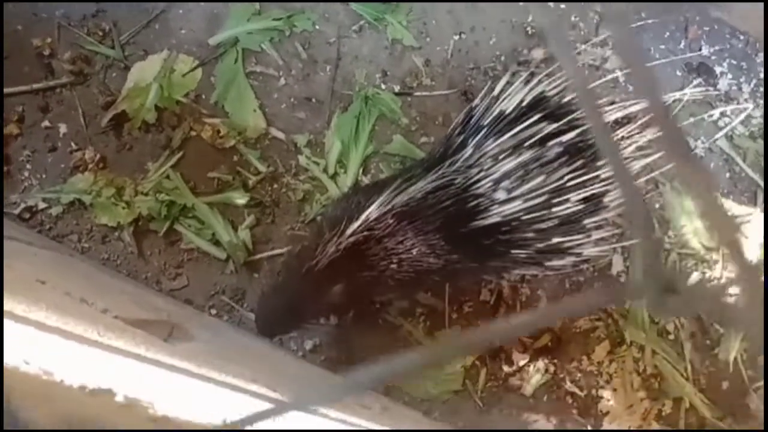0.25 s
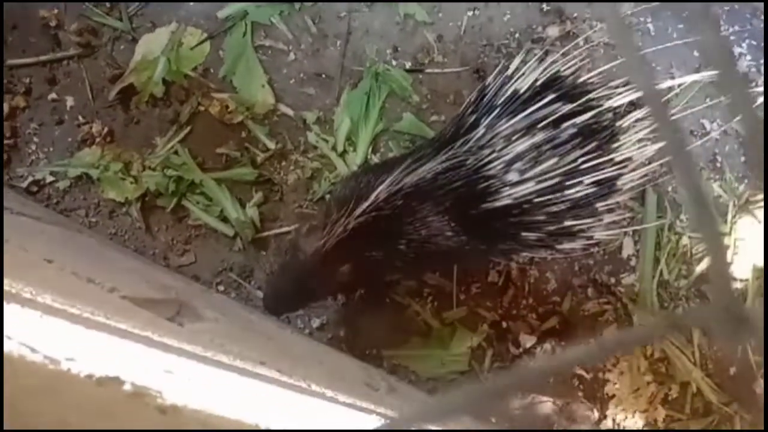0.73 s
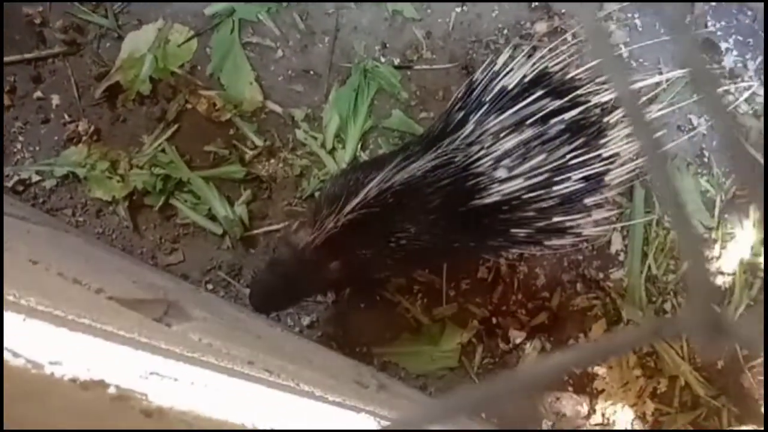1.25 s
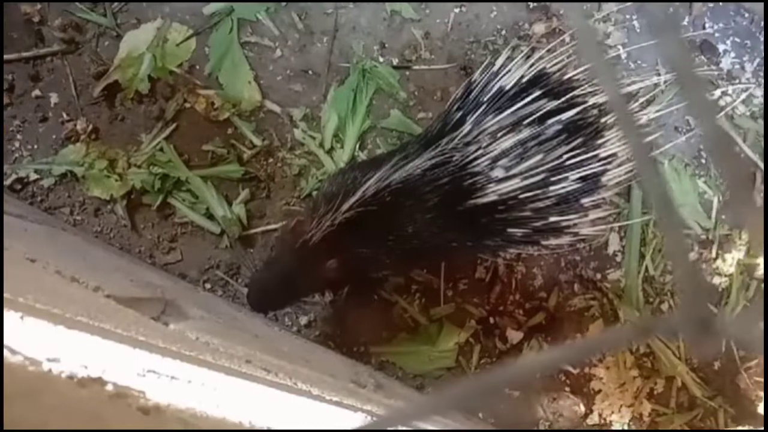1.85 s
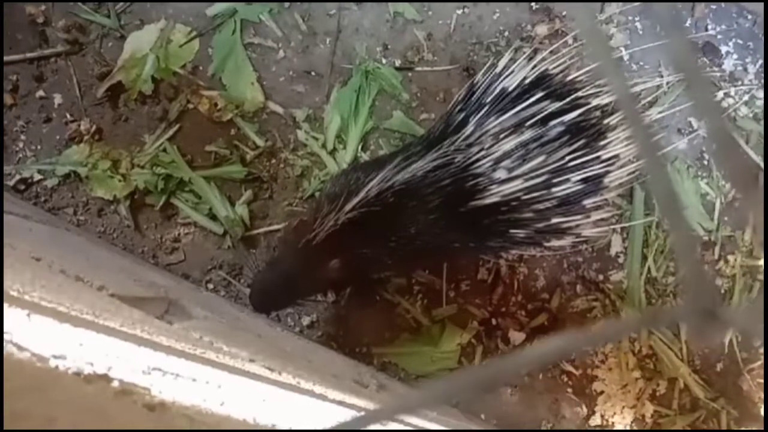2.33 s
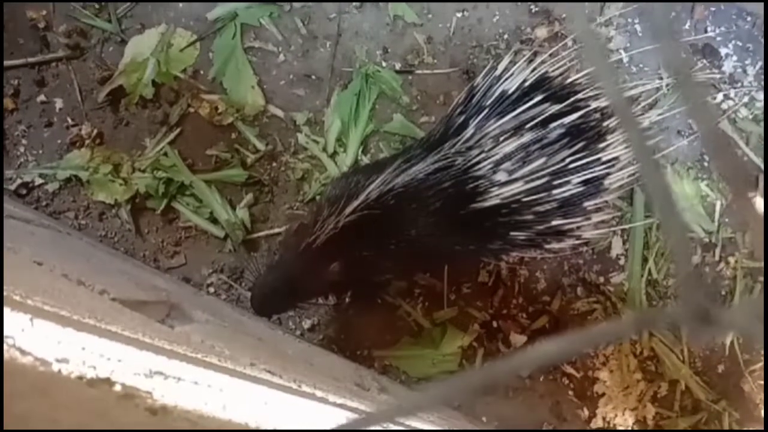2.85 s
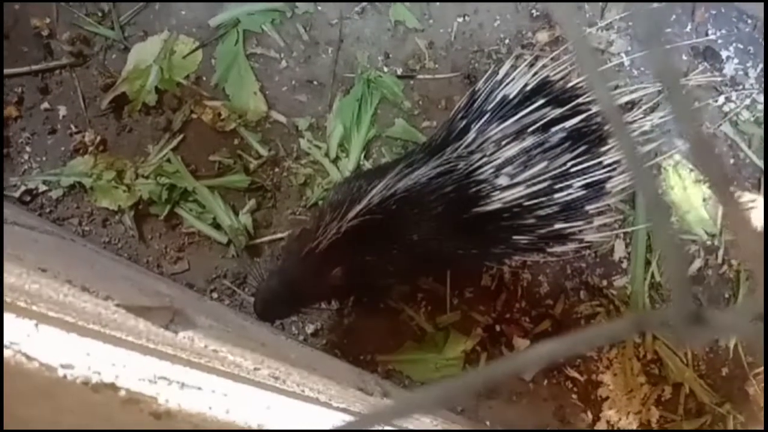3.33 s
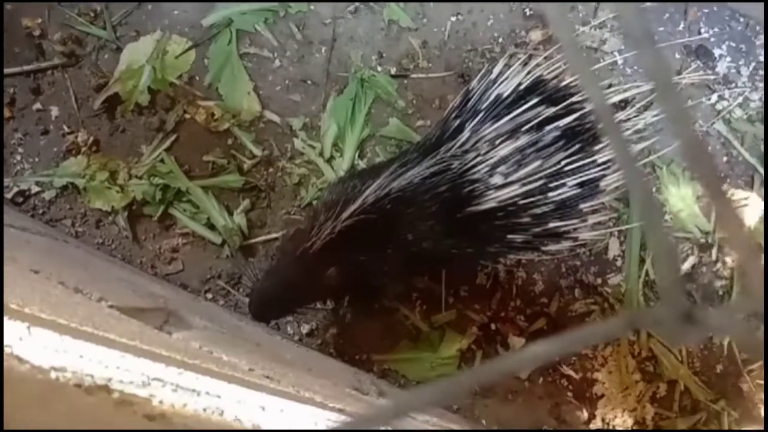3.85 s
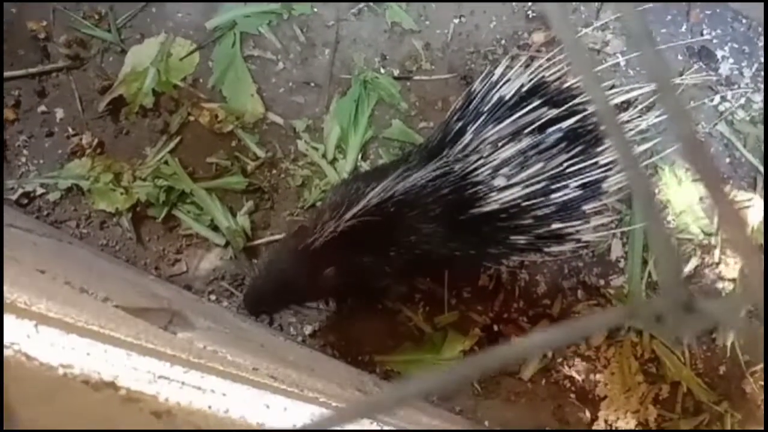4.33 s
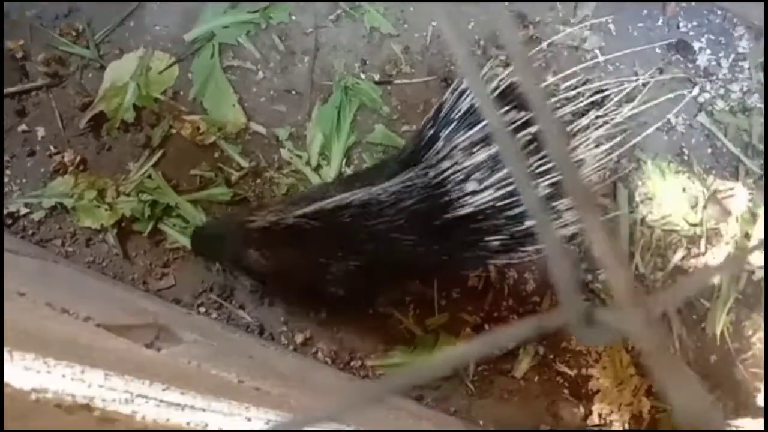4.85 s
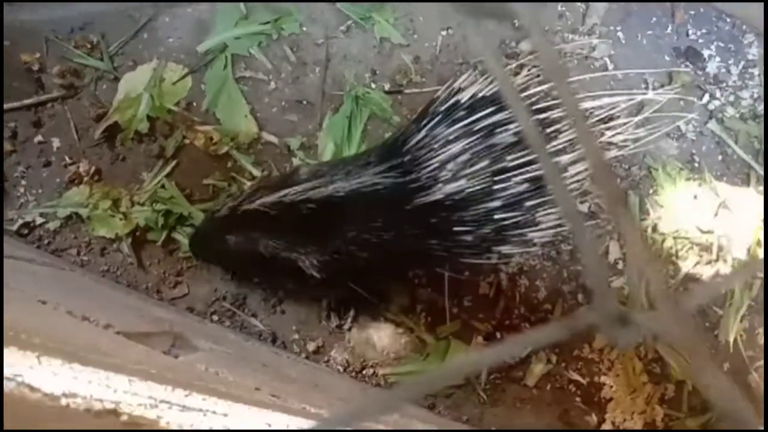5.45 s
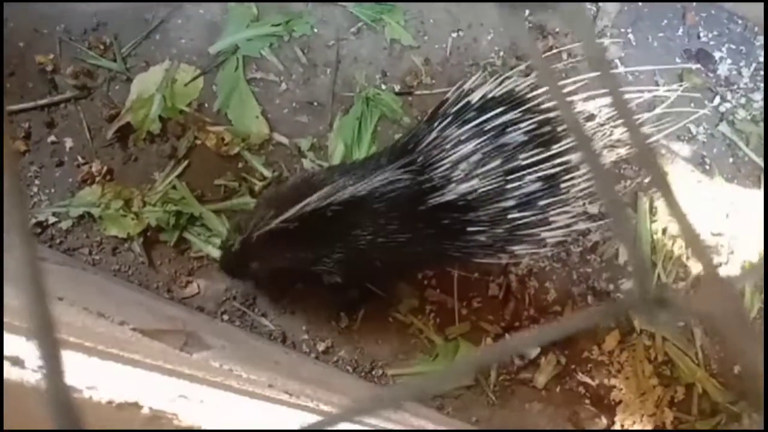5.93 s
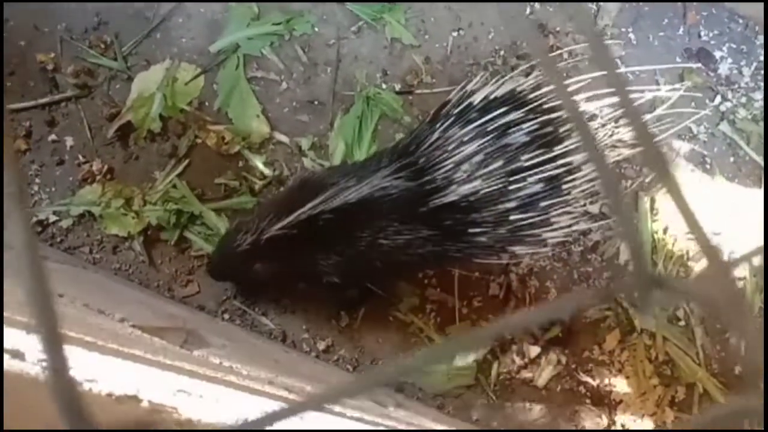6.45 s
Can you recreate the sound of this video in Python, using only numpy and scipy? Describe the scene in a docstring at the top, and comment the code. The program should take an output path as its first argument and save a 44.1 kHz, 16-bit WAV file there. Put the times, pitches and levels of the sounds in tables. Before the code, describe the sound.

Scattered crunches, sharp quill clicks and knocks sound against a faint wavering whirr, then a low engine begins to throb.

```python
"""A steady outdoor hiss and a wavering whirr surround a porcupine foraging among leaves in a pen.
It crunches and scuffs, tiny fractures exciting hollow resonances, and its quills collide and rattle.
A few knocks ring in damped modes close to the microphone, and faint tones sound far off.
Near the end a slow engine starts to throb, each firing ringing its exhaust, then picks up speed."""
import sys
import numpy as np
from scipy import signal
from scipy.fft import rfft, irfft
from scipy.io import wavfile
from scipy.ndimage import uniform_filter1d

SR = 44100
rng = np.random.default_rng(int(sys.argv[2]) if len(sys.argv) > 2 else 0)


def unload_audio(sound):
    """Save the sound as a 16-bit wav file, at the path given as the first command line argument."""
    columns = np.transpose(np.atleast_2d(sound))
    # keep every value between -1 and 1, then stretch to whole-number steps
    steps = np.round(np.clip(columns, -1, 1) * 32767)
    wavfile.write(sys.argv[1], SR, steps.astype(np.int16))


N = 295470


def amp(db):
    """Decibels to amplitude ratio."""
    return 10 ** (np.asarray(db) / 20)


def unit(x):
    """Normalisation to rms 1."""
    return x / np.sqrt(np.mean(x ** 2))


def sine(hz, t):
    """Simple harmonic motion."""
    return np.sin(2 * np.pi * hz * t)


def decay(t, t60):
    """Exponential damping: 60 dB in t60 seconds."""
    return np.exp(-np.log(1000) * t / t60)


def swell(t, peak_s):
    """A critically damped pulse, reaching 1 at peak_s."""
    return t / peak_s * np.exp(1 - t / peak_s)


def curve(rows):
    """Linear interpolation of (seconds, value) rows at every sample."""
    return np.interp(np.arange(N) / SR, *np.transpose(rows))


def add(out, s, x):
    """Superposition: x joins out from s seconds on."""
    i = int(s * SR)
    out[i:i + len(x)] += x[:N - i]


def colour(x, points):
    """Spectral shaping by (Hz, dB) points."""
    hz, db = np.transpose(points)
    f = np.maximum(np.fft.rfftfreq(len(x), 1 / SR), 1)
    return irfft(rfft(x) * amp(np.interp(np.log(f), np.log(hz), db)), len(x))


def band(x, hz, width):
    """Two like resonators in cascade give a band with steep skirts."""
    b, a = signal.iirpeak(hz, hz / (1.5 * width), fs=SR)
    return signal.lfilter(b, a, signal.lfilter(b, a, x))


def lowpass(x, hz):
    """Sixth-order roll-off above hz."""
    return signal.sosfilt(signal.butter(6, hz, fs=SR, output="sos"), x)


def highpass(x, hz):
    """Fourth-order roll-off below hz."""
    return signal.sosfilt(signal.butter(4, hz, "highpass", fs=SR, output="sos"), x)


def walk(rate):
    """Random modulation: levels held 1 / rate seconds, then smoothed."""
    hold = int(SR / rate)
    steps = np.repeat(rng.standard_normal(N // hold + 1), hold)
    return unit(uniform_filter1d(uniform_filter1d(steps, hold), hold)[:N])


def grit(n, spread_db, size=24):
    """Granular noise: each run of size samples has its own random strength."""
    grains = np.repeat(amp(spread_db * rng.standard_normal(n // size + 1)), size)[:n]
    return rng.standard_normal(n) * grains


def patter(low_hz, high_hz, t60, spread_db, count):
    """Incoherent sum: many small things ring briefly, each at its own moment and pitch."""
    out, t = np.zeros(N), np.arange(SR // 8) / SR
    shape = np.minimum(t / 0.015, 1) * decay(t, t60)
    for when, pitch, size in rng.random((count, 3)):
        hz = low_hz * (high_hz / low_hz) ** pitch
        add(out, when * (N - 1) / SR, amp(spread_db * size) * shape * sine(hz, t))
    return unit(out)


def burst(hz, width, rise_s, t60, spread_db):
    """Forced resonance: a burst of tiny fractures drives one hollow mode."""
    t = np.arange(SR // 3) / SR
    shape = np.minimum(t / rise_s, 1) * decay(np.maximum(t - rise_s, 0), t60)
    # small things radiate little below their resonance
    cracks = highpass(shape * grit(len(t), spread_db), .6 * hz)
    ring = band(cracks, hz, width)
    return ring * np.linalg.norm(shape) / np.linalg.norm(ring)


def fractures(rows, rise_s, t60, spread_db):
    """Modal superposition: each event sounds a burst in each of its resonances."""
    out = np.zeros(N)
    for s, width, *modes in rows:
        for hz, db in zip(modes[::2], modes[1::2]):
            add(out, s, amp(db) * burst(hz, width, rise_s, t60, spread_db))
    return out


# Spectra of the low air noise and the high hiss. Each row: frequency in Hz, relative density in dB.
AIR_SPECTRUM = [(25, -13), (45, -3.5), (80, 2.5), (130, -1.5), (220, -7), (450, -8.5), (700, -11.5),
                (1000, -13), (1600, -11), (2700, -9), (3500, -8.5), (4300, -18.5), (6000, -46)]
HISS_SPECTRUM = [(3000, -37), (4400, -13), (4900, -3.5), (5300, 4.5), (5850, 5), (6200, -4.5), (6900, 4.5),
                 (7400, -0.5), (7950, -14.5), (9300, -6.5), (11500, -11.5), (13700, -18), (15000, -18),
                 (16000, -10.5)]


def outdoor_air(air_db=-61.5, settled_db=-60.5, excess_db=6.5, settle_s=3.14):
    """Broadband noise: a steady rumble lies under a flickering hiss that starts higher and settles."""
    rumble = unit(colour(rng.standard_normal(N), AIR_SPECTRUM)) * amp(air_db + 0.1 * walk(21))
    hiss_db = settled_db + excess_db * np.exp(-np.arange(N) / SR / settle_s)
    hiss = unit(colour(rng.standard_normal(N), HISS_SPECTRUM)) * amp(hiss_db + 1.42 * walk(36))
    return rumble + hiss


# The whirr comes and goes. Each row: time in seconds, base level in dB.
WHIRR_ENVELOPE = [(0, -70.5), (.35, -63), (.72, -59.5), (1.15, -63), (1.5, -62.5), (1.8, -67), (2.1, -59),
                  (2.31, -61.5), (2.6, -59.5), (2.85, -68), (3.1, -76), (3.25, -68), (3.53, -71),
                  (3.9, -67.5), (4.6, -64.5), (5.3, -70), (5.5, -66), (5.8, -75), (6.1, -64), (6.7, -65)]
# Pulses that stand out as pings. Each row: start in seconds, frequency in Hz, level in dB.
WHIRR_PINGS = [(2.297, 1317, -46), (3.357, 1325, -50), (4.209, 1290, -51), (4.656, 1290, -51),
               (5.996, 1255, -47)]
WHIRR_HZ, WHIRR_STRAY_HZ, WHIRR_SWELL_S = 1254, 40, .009


def whirr(pulses_per_s=13, pulse_db=5, scatter_db=4, trace_db=-7):
    """A jittered pulse train: short rings stray in pitch over a faint trace of narrow-band noise."""
    out, t = np.zeros(N), np.arange(SR // 6) / SR
    level_db = curve(WHIRR_ENVELOPE)
    s = 0
    while s < (N - 1) / SR:
        pitch, size, gap = rng.uniform(-1, 1, 3)
        gain = amp(level_db[int(s * SR)] + pulse_db + scatter_db * size)
        add(out, s, gain * swell(t, WHIRR_SWELL_S) * sine(WHIRR_HZ + WHIRR_STRAY_HZ * pitch, t))
        s += (1 + .5 * gap) / pulses_per_s
    for s, hz, db in WHIRR_PINGS:
        add(out, s, amp(db) * np.minimum(t / .005, 1) * decay(t, t60=.12) * sine(hz, t))
    trace = unit(band(rng.standard_normal(N), WHIRR_HZ, width=160))
    return out + trace * amp(level_db + trace_db)


# The animal pushes through the leaves. Each row: start in seconds, length in seconds, level in dB.
LEAF_PUSHES = [(0.46, 0.36, -62), (2.328, 0.23, -57), (3.686, 0.348, -59.5), (4.16, 0.81, -64.5)]


def leaves(rest_db=-68, rise_s=0.097, fall_s=0.018):
    """Incoherent sources add in power: each push raises the rustle above a slight constant fidget."""
    t, power = np.arange(N) / SR, amp(rest_db) ** 2
    for s, length, db in LEAF_PUSHES:
        push = np.clip((t - s) / rise_s, 0, 1) * np.exp(-np.maximum(t - s - length, 0) / fall_s)
        power = power + (amp(db) * push) ** 2
    stems = patter(1900, 3050, t60=.09, spread_db=10, count=1900)
    crackle = amp(-8.5) * unit(band(grit(N, spread_db=3), 2200, width=450))
    return (stems + crackle) * np.sqrt(power) * amp(1.2 * walk(20))


def far_patter():
    """Sparse damped oscillations make a faint, low patter far off."""
    return amp(-73) * patter(170, 750, t60=.2, spread_db=12, count=150)


# Bites. Each row: start in seconds, bandwidth in Hz, then frequency in Hz and level in dB
# for each of the low, middle and high resonances.
BITES = [(.1955, 266, 1600, -42, 2790, -41.5, 3340, -44), (.273, 280, 2210, -43, 2520, -49, 2900, -73),
         (.717, 300, 3400, -58, 3700, -55, 3920, -59), (1.014, 350, 1380, -58, 2600, -52.5, 3130, -53),
         (1.052, 410, 1360, -49, 2070, -49.5, 2780, -46.5), (1.349, 277, 1460, -50, 1950, -45, 2210, -57),
         (2.0685, 350, 1290, -51, 2100, -45, 2650, -49.5), (4.397, 270, 1290, -52.5, 1630, -47, 2400, -55),
         (4.613, 300, 1460, -60, 1920, -53, 2900, -55), (4.932, 195, 1480, -46, 1900, -47, 2400, -47),
         (5.023, 168, 1370, -44.5, 1570, -62, 2450, -52.5), (5.191, 397, 1470, -53, 2820, -52.5, 3380, -51)]


def crunches():
    """Impulsive excitation: a quick bite sets three hollow resonances ringing."""
    return fractures(BITES, rise_s=.0025, t60=0.17, spread_db=2.5)


# Soft thumps, probably paws on the soil. Each row: start in seconds, level in dB.
SOFT_THUMPS = [(0.198, -49.5), (1.029, -55.5), (5.193, -54)]


def thumps(hz=270, width_hz=95):
    """Damped resonance: each soft impact excites one low band."""
    out = np.zeros(N)
    for s, db in SOFT_THUMPS:
        add(out, s, amp(db) * burst(hz, width_hz, rise_s=0.0013, t60=0.28, spread_db=2.5))
    return out


# Shakes of the whole coat, and single quill clicks. Each row: start in seconds, base level in dB.
COAT_SHAKES = [(.291, -48.5), (.786, -53.5), (4.396, -51), (4.933, -55), (5.359, -55.5), (6.394, -59.5)]
QUILL_CLICKS = [(1.053, -50), (1.351, -47.5), (1.385, -48), (1.426, -48), (1.4459, -44), (1.454, -45.5),
                (1.471, -48.5), (1.539, -43.5), (1.560, -45.5), (1.6609, -43.5), (1.758, -49.5),
                (1.861, -43.5), (1.895, -43), (1.925, -44.5), (1.9495, -42.5), (1.984, -42.5), (1.998, -47)]
# The spectrum of both. Each row: frequency in Hz, gain in dB.
QUILL_SPECTRUM = [(200, 2), (700, -6), (1500, 0.5), (2200, 3.5), (3000, 11), (3600, 6), (4400, -3),
                  (5200, 12), (5950, 13), (6300, 1), (6950, 12.5), (8100, -8), (9000, 3), (10400, 2),
                  (13000, -9.5), (15500, -20)]
# Ranges in which a struck quill rings. Each row: lowest and highest frequency in Hz.
QUILL_MODE_RANGES = [(5100, 6000), (5900, 7200)]


def quills(clack_db=-2.5, chatter_db=-15, ring_db=-1, min_skip_s=.0012, skip_loss_db=5):
    """Collision and rebound: hollow quills snap, skip once and chatter; single clicks also ring."""
    hits, rings, t = np.zeros(N), np.zeros(N), np.arange(SR // 3) / SR
    chatter = amp(chatter_db) * np.minimum(t / .01, 1) * decay(t, t60=.3)
    for rows, t60, snap_db in (QUILL_CLICKS, .065, 6), (COAT_SHAKES, 0.27, -5):
        clack = amp(clack_db) * np.minimum(t / .001, 1) * decay(t, t60)
        for s, db in rows:
            add(hits, s, amp(db) * (clack + chatter) * unit(grit(len(t), spread_db=4)))
            add(hits, s, amp([db + snap_db]))
            add(hits, s + min_skip_s * (1 + rng.random()), amp([db + snap_db - skip_loss_db]))
    for s, db in QUILL_CLICKS:
        for hz in rng.uniform(*np.transpose(QUILL_MODE_RANGES)):
            add(rings, s, amp(db + ring_db) * sine(hz, t) * decay(t, t60=0.041))
    hits = colour(hits, QUILL_SPECTRUM)
    ground_echo = .5 * np.roll(hits, int(0.0021 * SR))  # comb filtering makes the sound hollow
    return hits + ground_echo + rings


# Close knocks; the first lands twice and bounces. Each row: start in seconds, strength in dB at each
# of the five BLOW_HZ, tick level in dB, upper limit of the contact's band in Hz.
BLOWS = [(0.4749, -35, -15.5, -8, -20.5, -7, -58, 3500), (0.4757, -44, -6.5, -7.5, -41, -36, -70, 4300),
         (0.4993, -36, -27, -28.5, -34, -48, -75, 2980), (0.512, -33, -26, -57, -35, -46, -75, 1680),
         (0.526, -40, -43, -37, -35.5, -48, -75, 1400),
         (3.6839, -33.5, -32, -23.5, -24.5, -14.5, -24, 3600),
         (3.9305, -30, -26, -35, -43.5, -56, -55, 2270), (6.278, -38, -52, -30.5, -44.5, -28, -60, 2410)]
BLOW_HZ = [110, 280, 750, 1280, 2500]
# The modes they excite. Each row: frequency in Hz, gain in dB, 60 dB decay time in seconds.
STRUCK_MODES = [(94.2, -2, 0.082), (150, 6.5, 0.017), (254, 1.5, 0.0276), (408, 4.5, 0.0076),
                (700, 0.8, 0.0094), (1080, -3.5, 0.013), (1259, -2, 0.037), (1417, 0, 0.015),
                (2004, -7, 0.01), (2620, -9.5, 0.0049), (3600, -15, 0.0036)]
# The tick of first contact. Each row: frequency in Hz, gain in dB.
TICK_SPECTRUM = [(500, -6), (3200, -28), (4400, -19), (5800, 14), (7000, -7), (8000, 1), (10000, 4),
                 (13000, -5), (15500, -9)]


def knocks():
    """Modal vibration: where a blow lands weights the same damped modes; soft contact dulls them."""
    out, ticks, t = np.zeros(N), np.zeros(N), np.arange(SR // 4) / SR
    for s, *strengths_db, tick_db, top_hz in BLOWS:
        ring = 0
        for k, (hz, db, t60) in enumerate(STRUCK_MODES):
            blow_db = np.interp(np.log(hz), np.log(BLOW_HZ), strengths_db)
            ring = ring + (-1) ** k * amp(db + blow_db) * sine(hz, t) * decay(t, t60)
        add(out, s, lowpass(ring, top_hz))
        add(ticks, s, amp([tick_db]))
    return out + colour(ticks, TICK_SPECTRUM)


# Scuffs. Each row: start in seconds, bandwidth in Hz, then three pairs of frequency in Hz, level in dB.
SLOW_SCUFFS = [(.812, 221, 602, -48.5, 1330, -52, 2500, -54.5),
               (2.137, 120, 820, -50.5, 1306, -51, 2460, -56.5),
               (2.575, 400, 2140, -64, 2550, -54.5, 2920, -57),
               (3.79, 300, 1880, -70, 2150, -69, 2400, -73), (4.17, 249, 2030, -69, 2120, -56, 2400, -68),
               (4.275, 248, 1950, -72, 2120, -55.5, 2300, -62),
               (4.695, 260, 1960, -61, 2200, -57.5, 2900, -63),
               (6.28, 300, 2300, -62, 2720, -62, 2960, -61)]


def scuffs():
    """Gradual excitation: a slow scuff swells and fades in three hollow resonances."""
    return fractures(SLOW_SCUFFS, rise_s=0.036, t60=0.29, spread_db=2)


# Far-off tones. Each row: start in seconds, length in seconds, frequency in Hz, level in dB.
DISTANT_TONES = [(1.29, 0.48, 737, -61.5), (2.35, 0.11, 394, -65), (2.52, 0.073, 393, -62),
                 (2.905, 0.094, 432, -63.5), (3.42, 0.11, 511, -67), (4.071, 0.12, 500, -61),
                 (4.949, 0.18, 680, -61.5)]


def far_tones(width_hz=48, flutter_db=3):
    """Fluctuating narrow-band noise is heard as faint tones, blurred and broken by distance."""
    out = np.zeros(N)
    for s, length, hz, db in DISTANT_TONES:
        n = int(length * SR)
        tone = band(rng.standard_normal(SR), hz, width_hz)[-n:]
        flutter = amp(flutter_db * walk(28.8)[:n])
        add(out, s, amp(db) * unit(tone * flutter) * signal.windows.tukey(n, .5))
    return out


# Engine speed. Each row: time in seconds, firings per second.
FIRING_RATE = [(5.315, 14.45), (6.146, 14.45), (6.346, 16.3), (6.7, 17.0)]
# Exhaust resonances, and the pipe's two main notes, of which the lower also lingers as a hum.
# Each row: frequency in Hz, relative level in dB, time to peak in seconds.
EXHAUST_MODES = [(77.4, -8.5, 0.011), (178, -6.5, 0.018), (206.1, -10, 0.063), (404.3, -19, 0.037)]
PIPE_MODES = [(118, -2.3, .021), (119, -16, .05), (294, 1.8, .014)]


def engine(idle_db=-50, db_per_hz=2.5, scatter_db=1.4, detune=.014, jitter_s=.0006, lag_s=.0012):
    """Quasi-periodic excitation: firings ring the exhaust; faster is louder, rougher and bassier."""
    out, t = np.zeros(N), np.arange(SR // 5) / SR
    start_s, idle_hz = FIRING_RATE[0]
    start, rate_hz = int(start_s * SR), curve(FIRING_RATE)
    cycles = np.cumsum(rate_hz[start:]) / SR
    for i in start + np.flatnonzero(np.diff(np.floor(cycles), prepend=-1)):
        s = i / SR + jitter_s * rng.standard_normal()
        above_idle_hz = rate_hz[i] - idle_hz
        weak_start_db = -6 * np.exp((start - i) / SR / 0.049)
        level_db = idle_db + db_per_hz * above_idle_hz + weak_start_db
        bass_db = 4.5 + 1.3 * above_idle_hz
        for hz, db, peak_s in EXHAUST_MODES + PIPE_MODES:
            size, stretch = rng.standard_normal(2)
            gain = amp(level_db + db + bass_db * (hz < 200) + scatter_db * size)
            ring = swell(t, peak_s) ** 2 * sine(hz * (1 + detune * stretch), t)
            add(out, s + lag_s * rng.uniform(-0.87, 1), gain * ring)
        add(out, s, gas_noise(t, level_db, growl_db=-13 + 1.3 * above_idle_hz))
        clink = loose_part(t, scatter_db)
        add(out, s - .009, clink)  # just ahead of the firing
    return out


def gas_noise(t, level_db, growl_db, puff_db=-19, rasp_db=-63):
    """Band-limited noise of one firing: a dull puff of gas, a rough growl and a faint rasp."""
    puff = unit(band(rng.standard_normal(len(t)), 250, width=160))
    puff *= amp(puff_db) * np.minimum(t / 0.0027, 1) * np.exp(-t / 0.092)
    rasp = unit(band(grit(len(t), spread_db=0), 2200, width=2000)) * swell(t, 0.011)
    growl = unit(band(rng.standard_normal(len(t)), 260, width=117)) * swell(t, 0.022)
    return amp(level_db) * (puff + amp(growl_db) * lowpass(growl, 520)) + amp(rasp_db) * rasp


def loose_part(t, scatter_db, db=-61):
    """Free vibration: a loose engine part clinks near the whirr's pitch."""
    hz = WHIRR_HZ + WHIRR_STRAY_HZ * rng.uniform(-1.1, 1)
    return amp(db + scatter_db * rng.standard_normal()) * swell(t, WHIRR_SWELL_S) * sine(hz, t)


def pen(x, wet_db=-23, t60=1.0, delay_s=0.0021):
    """Reverberation: the walls of the pen return a dull, exponentially decaying echo."""
    t = np.arange(SR) / SR
    spectrum = [(80, 10.5), (250, 3.5), (500, 18), (1000, 11), (1350, 14), (1700, 7.5), (2700, 23),
                (6000, -12), (15000, -21)]
    tail = colour(rng.standard_normal(SR), spectrum) * (t > delay_s) * decay(t, t60)
    return x + amp(wet_db) * signal.fftconvolve(x, tail / np.linalg.norm(tail))[:N]


def scene():
    """Superposition of all sources; a very faint noise, different left and right, adds slight width."""
    foraging = lowpass(crunches() + scuffs() + thumps(), 3900)
    mono = pen(foraging + quills() + knocks()) + engine() + far_tones()
    mono += outdoor_air() + leaves() + far_patter() + whirr()
    noise_spectrum = [(30, 0), (200, 4), (700, 7), (2500, -4.5), (14000, -43)]
    stereo_noise = [unit(colour(rng.standard_normal(N), noise_spectrum)) for _ in range(2)]
    return mono + amp(-80.5) * np.array(stereo_noise)


def record(dry, low_hz=52, top_hz=15600):
    """Band limiting: the deepest bass is thinned and the top is cut."""
    return signal.sosfilt(signal.ellip(8, .2, 70, top_hz, fs=SR, output="sos"), highpass(dry, low_hz))


dry = scene()
out = record(dry)
unload_audio(out)
```